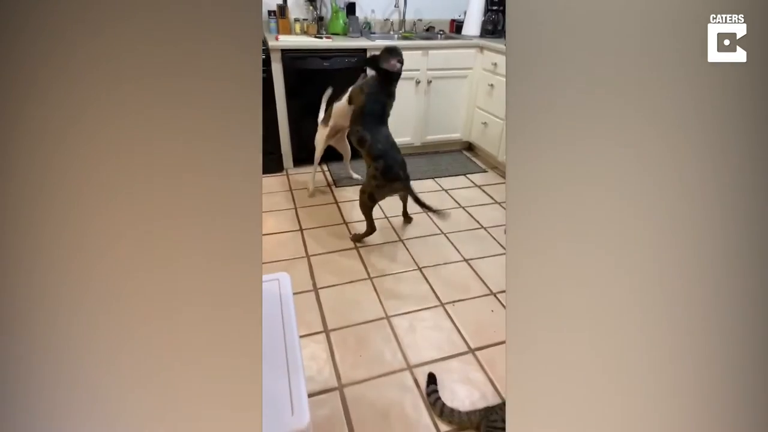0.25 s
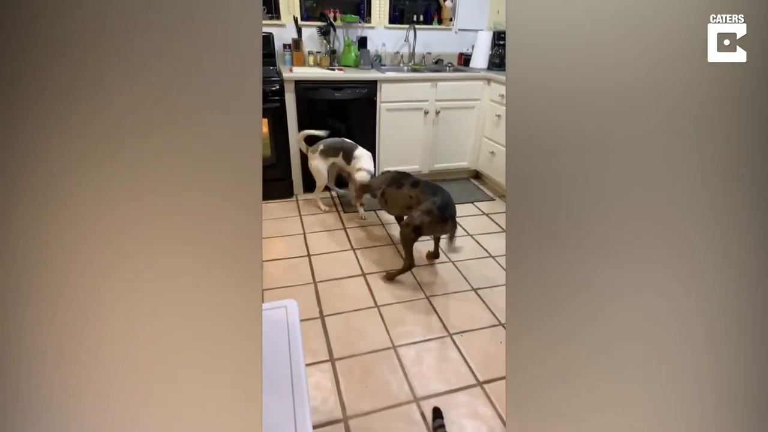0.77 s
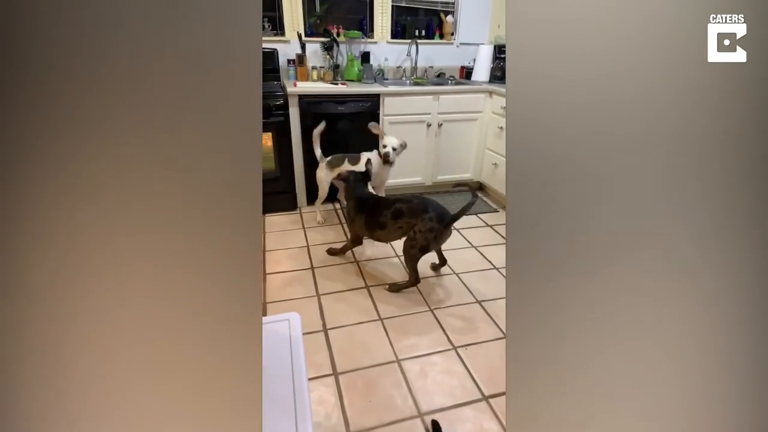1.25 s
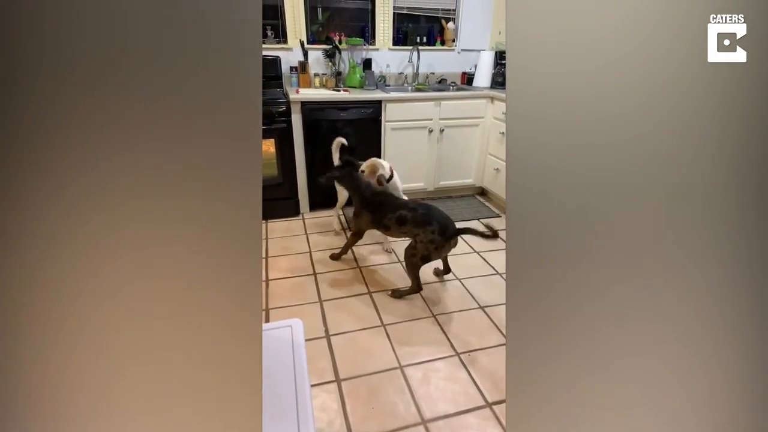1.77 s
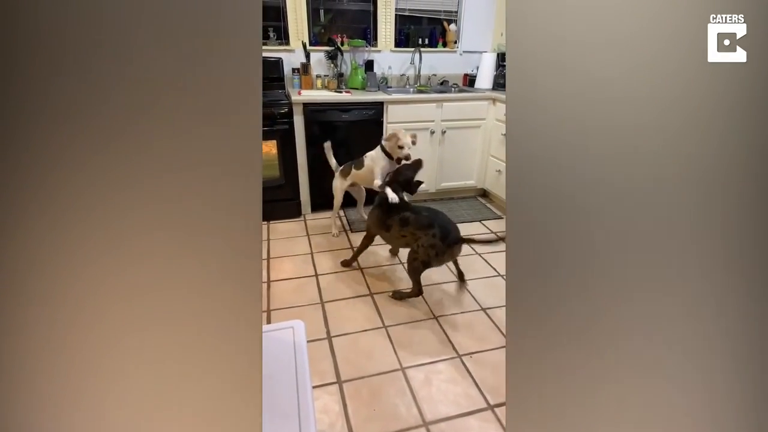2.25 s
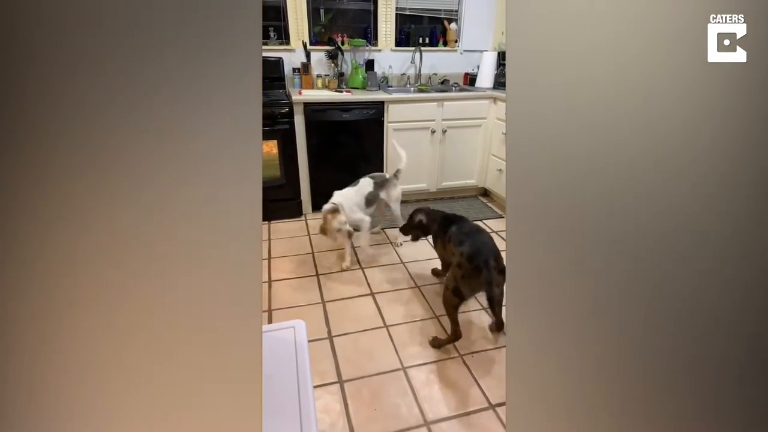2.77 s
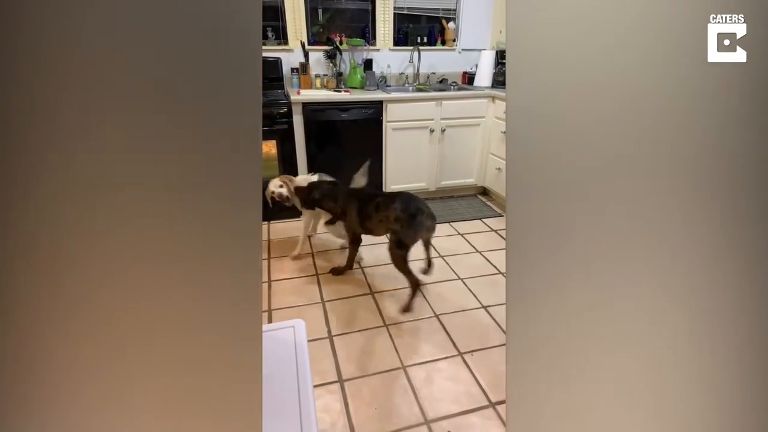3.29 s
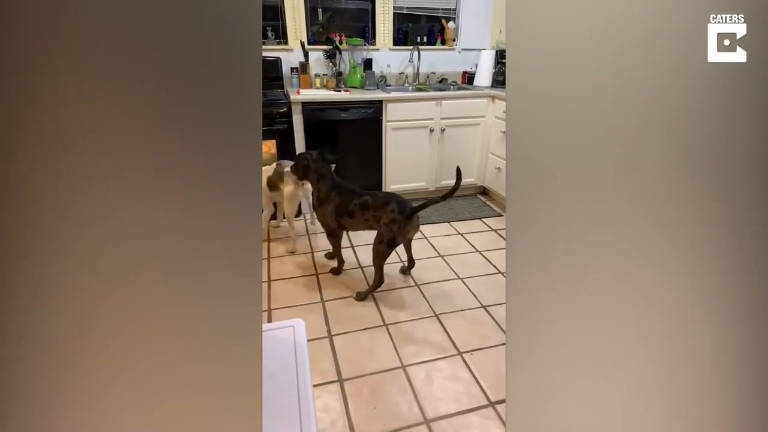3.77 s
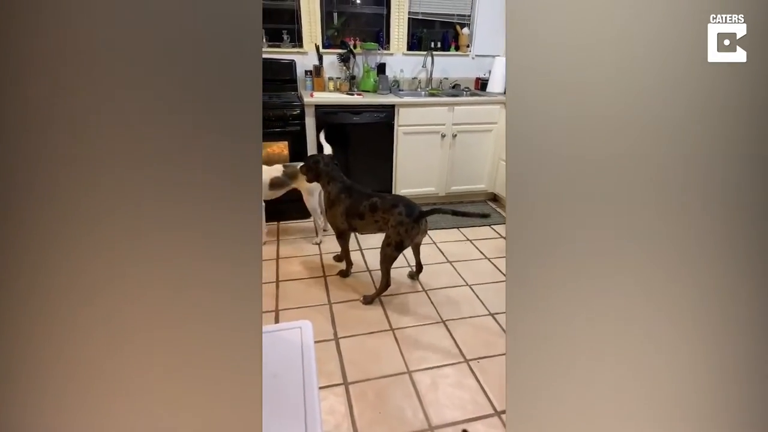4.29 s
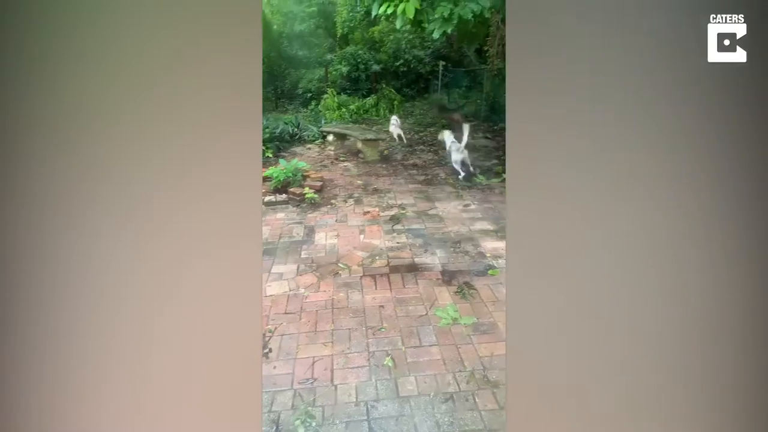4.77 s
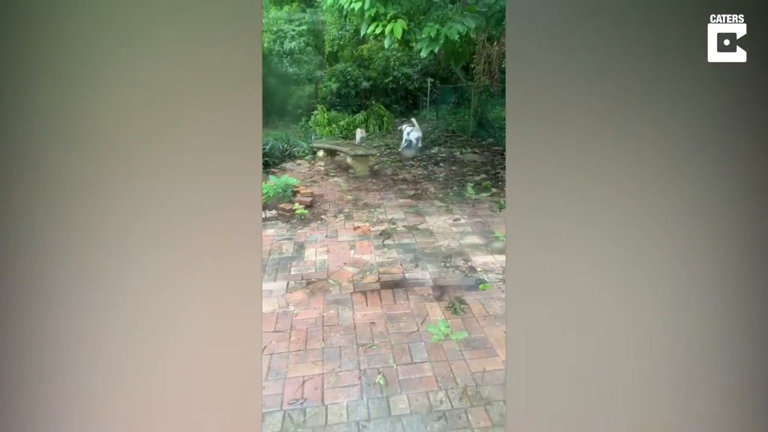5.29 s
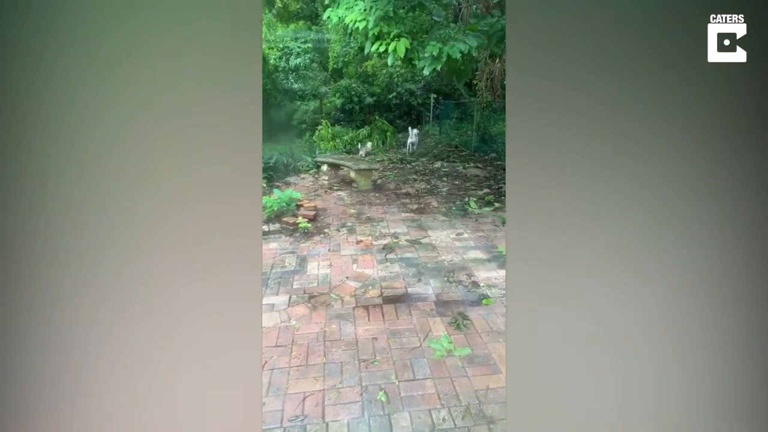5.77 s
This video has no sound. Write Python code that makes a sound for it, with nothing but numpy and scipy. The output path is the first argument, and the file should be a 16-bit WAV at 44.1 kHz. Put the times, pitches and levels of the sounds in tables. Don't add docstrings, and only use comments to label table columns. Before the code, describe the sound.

Two dogs scuffle on kitchen tiles, claws ticking and skidding, paws thumping, panting and faint squeaks over a low hum, then a droning quiet yard.

```python
import sys
import numpy as np
from scipy import signal
from scipy.fft import rfft, irfft
from scipy.io import wavfile
from scipy.ndimage import uniform_filter1d

SR = 44100
rng = np.random.default_rng(int(sys.argv[2]) if len(sys.argv) > 2 else 0)


def gain_from_decibels(decibels):
    exponent = np.asarray(decibels, float) / 20
    return 10 ** exponent


def output_pcm(signal):
    pcm = np.clip(np.atleast_2d(signal).T, -1, 1) * 32767
    wavfile.write(sys.argv[1], SR, np.round(pcm).astype(np.int16))


N = 266364

# (time [s], peak [dB], treble share [dB], low-mid share [dB], ring
# [Hz])
CLAWS = [(0.0044, -48, -14, 9, 2200), (0.175, -35, 6.5, -0.5, 2980), (0.2474, -42.5, -6, -6.5, 1370),
         (0.365, -46, -15, 5, 1290), (0.326, -47, 11, -30, 2980), (0.4471, -48.5, -24, -0.5, 980),
         (0.589, -26, 3.5, -20, 2740), (0.599, -31, -2.5, -2.5, 2220), (0.6605, -28.5, -1, -9, 2840),
         (0.7549, -26, 3.5, -12, 2040), (1.0192, -15, 5, -14.5, 3110), (1.031, -25.5, -1.5, -6, 3450),
         (1.2599, -40, -5, 2.5, 1120), (1.3778, -43.5, -29.5, 0, 2080), (1.4247, -46, 12.5, 0, 2000),
         (1.467, -42, -4, 1.5, 1840), (1.666, -43, -6, 0.5, 1580), (2.0244, -22.5, 6.5, -14.5, 2170),
         (2.1329, -19, 5, -20, 3800), (2.143, -24.5, 7, -1, 2880), (2.5281, -41.5, -6.5, -10.5, 1020),
         (2.587, -39.5, -16, -3, 1180), (2.643, -27, 3, -9, 1980), (2.678, -38, -9.5, 3, 1560),
         (2.766, -35, 11.5, -24, 1960), (2.7934, -26, -4.5, -27, 2800), (2.8, -24, -3, -12, 1810),
         (3.146, -36.5, 1.5, -12, 3230), (3.343, -25, 4.5, -15, 3760), (3.383, -27.5, -8.5, -13, 2340),
         (3.4225, -33, -3.5, -6, 1260), (3.4787, -31, -1, -27, 3480), (3.5267, -24.5, 4, -15, 1660),
         (3.535, -32.5, 5.5, -6, 3270), (3.668, -37.5, 0.5, -32.5, 2080), (3.7285, -37.5, 4.5, -23, 2590),
         (3.8315, -24, 4, -21, 2080), (3.847, -35.5, -1, -16, 2150), (4.27, -57, -18, -11.5, 1400),
         (4.424, -69.5, -5, -22, 3250),
         (0.593, -29.5, 3, -21.5, 2730), (0.606, -31, -3.5, -15, 2100), (0.6638, -28.5, -8, -3, 1210),
            (0.766, -36, 3, -15, 3970), (1.0242, -18.5, 5, -18, 4230), (1.043, -25.5, 0.5, -11.5, 4200),
            (2.587, -38, -22, 7, 700), (2.6471, -29, 1, -8, 2000), (2.671, -29.5, -12.5, -1.5, 990),
            (2.687, -33.5, -10.5, -8, 2280), (3.157, -43.5, -0.5, -9, 1200),
            (3.347, -27.5, 4.5, -13.5, 3670), (3.31, -53.5, 11.5, -23, 3000)]
# (time [s], peak [dB], body pitch [Hz], ring t60 [s])
PAWS = [(0.123, -49, 900, 0.15), (0.149, -29.5, 446, 0.029), (0.156, -34.5, 600, 0.03),
        (0.325, -52.5, 199, 0.1), (0.361, -46, 292, 0.057), (0.451, -46, 997, 0.043),
        (0.591, -38, 276, 0.05), (0.665, -31, 322, 0.021), (1.028, -30.5, 394, 0.028),
        (1.181, -41, 1480, 0.048), (1.26, -44.5, 451, 0.051), (1.274, -42, 1100, 0.03),
        (1.398, -41, 740, 0.036), (1.468, -37, 426, 0.03), (1.488, -38.5, 528, 0.031),
        (1.485, -43, 692, 0.069), (1.632, -54.5, 1677, 0.21), (2.141, -37, 277, 0.055),
        (2.139, -38, 437, 0.11), (2.169, -38, 470, 0.041), (2.203, -38.5, 468, 0.058),
        (2.243, -48.5, 454, 0.055), (2.353, -40, 273, 0.063), (2.525, -41.5, 930, 0.047),
        (2.582, -32, 365, 0.021), (2.671, -40.5, 410, 0.074), (2.703, -42, 1150, 0.023),
        (2.74, -38.5, 884, 0.047), (2.838, -40.5, 304, 0.039), (2.958, -36, 350, 0.044),
        (2.96, -35, 210, 0.028), (2.957, -36.5, 662, 0.027), (2.974, -39, 394, 0.016),
        (3.341, -49, 430, 0.12), (3.425, -40, 322, 0.061), (3.468, -44, 522, 0.22), (3.51, -46, 516, 0.11),
        (3.682, -37.5, 578, 0.032), (3.659, -44, 191, 0.053), (3.654, -37, 662, 0.036),
        (3.73, -50, 1800, 0.051), (3.951, -48, 430, 0.044), (4.245, -55, 878, 0.15)]
# (start [s], length [s], pitch [Hz], level [dB], overtones over the fundamental [dB])
WHINES = [(0.0, 0.02, 1170, -47.5, -5.5), (0.858, 0.036, 1093, -50, -18), (0.931, 0.05, 1090, -60, -13),
          (0.967, 0.03, 1075, -67, 7), (0.983, 0.036, 1115, -49.5, -21), (1.639, 0.14, 1128, -53.5, -15),
          (1.88, 0.11, 1164, -62, 11.5), (1.946, 0.07, 1165, -54, -9), (2.359, 0.08, 1166, -61, 7),
          (2.401, 0.058, 1128, -51, -41), (2.568, 0.089, 1098, -44.5, -28), (2.651, 0.066, 1113, -48, -5.5),
          (2.859, 0.082, 1222, -49.5, -5.5), (2.89, 0.09, 1133, -48.5, -8.5),
          (3.324, 0.053, 1264, -44, -10.5), (3.366, 0.13, 1259, -47, -17), (3.695, 0.14, 1246, -45.5, -10),
          (3.725, 0.047, 1277, -39.5, -11.5), (3.782, 0.075, 1240, -67, -19), (3.934, 0.05, 1258, -70, -6),
          (4.564, 0.079, 1333, -66, -10)]
# (start [s], length [s], effort [dB], main mouth resonance [Hz])
PANTS = [(0.0, 0.076, -61, 1212), (0.108, 0.21, -48.5, 917), (0.24, 0.37, -57.5, 935),
         (0.433, 0.11, -48, 935), (0.589, 0.16, -38.5, 1032), (0.66, 0.11, -53, 925),
         (0.832, 0.062, -44.5, 1079), (0.987, 0.15, -43.5, 997), (1.159, 0.11, -69.5, 891),
         (1.227, 0.12, -47.5, 1068), (1.347, 0.085, -50.5, 950), (1.457, 0.039, -45, 707),
         (1.607, 0.15, -55.5, 1162), (1.842, 0.24, -44.5, 1098), (2.1, 0.073, -54, 1143),
         (2.345, 0.062, -44, 852), (2.405, 0.11, -59, 1136), (2.534, 0.047, -43.5, 1010),
         (2.648, 0.19, -46.5, 1010), (2.786, 0.059, -67, 1012), (2.837, 0.26, -46, 1156),
         (3.126, 0.09, -43, 1065), (3.178, 0.096, -43, 866), (3.317, 0.073, -69, 1200),
         (3.403, 0.15, -43.5, 827), (3.634, 0.076, -59, 800), (3.703, 0.052, -49.5, 1185),
         (3.925, 0.042, -77.5, 1131), (4.184, 0.1, -58, 1301), (4.235, 0.075, -62, 927)]
# (factor on the main resonance [ratio], width [Hz], level [dB])
MOUTH = [(0.519, 162, -1), (1.0, 170, 6), (1.698, 293.4, -9.5), (2.398, 343, -12)]
# (start [s], length [s], pressure [dB])
SLIDES = [(0.0, 0.048, -49.5), (0.069, 0.12, -57), (0.295, 0.056, -77), (0.464, 0.14, -66),
          (0.614, 0.21, -77), (0.782, 0.31, -61.5), (1.075, 0.21, -53), (1.359, 0.1, -52),
          (1.634, 0.16, -55.5), (1.821, 0.19, -50), (2.035, 0.1, -59), (2.311, 0.19, -52),
          (2.454, 0.23, -49), (2.568, 0.075, -57), (2.701, 0.14, -47), (2.825, 0.16, -47),
          (2.888, 0.32, -65), (3.16, 0.55, -64), (3.24, 0.12, -64), (3.43, 0.15, -61), (3.531, 0.19, -44.5),
          (3.678, 0.13, -46.5), (3.845, 0.084, -65), (4.214, 0.08, -78)]
# (frequency [Hz], level [dB])
SLIDE_COLOUR = [(900, -7), (1800, -5), (3000, -9.5), (4300, -12), (6500, -7.5), (8500, -22.5)]
# (frequency [Hz], t60 [s])
ROOM_DECAY = [(250, 0.37), (700, 0.43), (1800, 0.46), (4600, 0.39), (8000, 0.31)]
# (full level until [s], silent from [s])
FADE = (3.895, 4.614)
# (frequency [Hz], rms level [dB])
FRIDGE = [(59.6, -68.5), (119.3, -54), (238.6, -82)]
# (frequency [Hz], density [dB per Hz])
KITCHEN_AIR = [(12, -53), (20, -1.5), (123, 3), (185, -2), (2260, -27), (4400, -34), (4870, -70),
               (5400, -46), (6790, -37.5), (9000, -61), (11700, -79), (19800, -120)]
# (start [s], length [s], leaves level [dB], thud level [dB])
STRIDES = [
    (4.649, 0.12, -76.5, -53.5),
    (4.713, 0.14, -68, -55.5),
    (4.82, 0.14, -77, -63.5),
    (4.894, 0.062, -71, -66),
    (4.913, 0.071, -80, -54),
    (4.957, 0.095, -78, -70),
    (5.265, 0.13, -78, -83),
    (5.318, 0.13, -79.5, -70),
    (5.429, 0.075, -79.5, -79),
    (5.704, 0.062, -88.5, -74.5),
]
# (time [s], peak [dB], treble [dB], low-mid [dB], ring [Hz], firm snap at that distance [dB])
TWIG = (4.727, -62, 18, -10, 2500, -62)
# (frequency [Hz], rms level [dB])
COMPRESSOR = [(59.2, -58.5), (118.4, -47), (236.9, -68.5), (355.3, -76.5), (414.5, -70), (532.9, -76.5),
              (651.4, -78), (1249, -75.5), (1308, -69), (1427, -90), (2374, -97), (3801, -99.5)]
# (frequency [Hz], density [dB per Hz])
YARD_AIR = [(12, -41.5), (20, -3.5), (69, -15), (125, -4), (174, -16.5), (308, -24), (419, -26.5),
            (909, -44.5), (1270, -32.5), (1560, -52), (2300, -55), (4860, -61), (6620, -58), (9500, -74.5),
            (12400, -107), (20900, -120)]
# (frequency [Hz], level [dB])
MICROPHONE = [(20, 0), (4200, 0), (4650, -7), (4880, -20.5), (5120, -4.5), (5600, -2), (8400, 5.5),
              (8800, -4.5), (9100, -23.5), (9500, -12.5), (9900, -30), (10500, -94.5)]
# (frequency [Hz], step over the neighbouring level [dB])
ROUNDING_STEP = [(400, -30), (1200, -11), (2200, -5), (3200, 0), (4000, 2), (4850, 6), (5500, -1),
                 (8600, 0), (9300, 5), (10000, 12)]


def evened(x):
    return x / np.sqrt(np.mean(x ** 2) + 1e-20)


def read(points, hz):
    f, value = np.transpose(points)
    return np.interp(np.log(hz + 1), np.log(f + 1), value)


def coloured(x, points):
    gain = gain_from_decibels(read(points, np.fft.rfftfreq(len(x), 1 / SR)))
    return irfft(rfft(x) * gain, len(x))


def add(mix, s, sound):
    part = mix[round(s * SR):][:len(sound)]
    part += sound[:len(part)]


def resonate(x, hz, width):
    turn = np.exp(2j * np.pi * np.cumsum(hz * np.ones(len(x))) / SR)
    r = np.exp(-np.pi * width / SR)
    return 2 * (turn * signal.lfilter([1 - r], [1, -r], x / turn)).real


def wander(per_s):
    size = max(int(SR / per_s), 1)
    return evened(uniform_filter1d(uniform_filter1d(rng.standard_normal(N), size), size))


def strokes(starts, lengths, levels_db, rest_db):
    peak_at = 0.32
    out = gain_from_decibels(rest_db) * np.ones(N)
    for s, length, db in zip(starts, lengths, levels_db):
        u = np.arange(0, length, 1 / SR) / length
        swell = np.minimum(u / peak_at, (1 - u) / (1 - peak_at))
        add(out, s, gain_from_decibels(db) * np.sin(np.pi / 2 * swell) ** 2)
    return out


def claw(s, peak_db, treble_db, low_db, ring_hz, firm_db=-29.5):
    t = np.arange(2048) / SR
    skid_ms = 5.07 + max(firm_db - peak_db, 0)
    rate = 1000 / max(skid_ms, .3)
    chatter = rng.standard_normal(2048) * gain_from_decibels(2 * rng.standard_normal(64)).repeat(32)
    burst = chatter * np.exp(-rate * t) * (1 - np.exp(-9 * rate * t))
    shape = [(250, low_db + 9.0), (1000, low_db + 12.0), (2300, 0.8), (4000, -4.0),
             (6600, treble_db), (9000, treble_db - 16.0)]
    hz = np.geomspace(400, 9000, num=24)
    ring_db = 5.5 * np.exp(-(np.log2(hz / ring_hz) / 0.25) ** 2)
    lumps = np.c_[hz, ring_db + 1.6 * rng.standard_normal(24)]
    burst = coloured(coloured(np.pad(burst, 256), shape), lumps)
    return s - 256 / SR, gain_from_decibels(peak_db + 0.5) * burst / abs(burst).max()


def paw(s, peak_db, hz, t60):
    t = np.arange(8000) / SR
    dull = [(80, -20), (hz / 2, -4), (hz, 0), (hz * 2, -6), (3000, -30)]
    puff = evened(coloured(rng.standard_normal(8000), dull))
    ring = np.sin(2 * np.pi * hz * t) + .3 * puff
    push = 1 - np.exp(-t / 0.0022)
    return s, 0.99 * gain_from_decibels(peak_db - 60 * t / max(t60, .01)) * ring * push


def whine(s, length, hz, level_db, overtones_db):
    climb, scoop, scoop_share, jitter = .02, .03, .25, .007
    third_db, fall_db = -4.5, 7
    shimmer_db, sag_db, rise = 3.5, -3, .2
    u = np.arange(0, length, 1 / SR) / length
    chance = rng.standard_normal((9, SR // 4))
    levels_db = [0, overtones_db] + [overtones_db + third_db - fall_db * k for k in range(6)]
    shake = evened(uniform_filter1d(chance[0], 200))[:len(u)]
    pitch = hz * (1 + climb * (u - .5) - scoop * np.exp(-u / scoop_share) + jitter * shake)
    turns = np.cumsum(pitch) / SR
    shimmer = gain_from_decibels(shimmer_db * evened(uniform_filter1d(chance[1:], 380)))[:, :len(u)]
    voice = sum(gain_from_decibels(db) * shimmer[k] * np.sin(2 * np.pi * (k + 1) * turns)
                for k, db in enumerate(levels_db))
    return s, voice * gain_from_decibels(level_db + sag_db * u) * np.clip(np.minimum(u, 1 - u) / rise, 0, 1)


def sinking_db():
    return -74 * np.maximum(np.arange(N) / SR - FADE[0], 0)


def panting():
    s, length, pant_db, mouth_hz = np.transpose(PANTS)
    breath = rng.standard_normal(N) * gain_from_decibels(3 * wander(30))
    held = np.c_[s + .2 * length, s + .6 * length].ravel()
    mouth = np.interp(np.arange(N) / SR, held, mouth_hz.repeat(2))
    pant = np.zeros(N)
    for factor, width, db in MOUTH:
        once = resonate(breath, factor * mouth, width)
        pant += gain_from_decibels(db) * resonate(once, factor * mouth, width)
    return gain_from_decibels(-10.0) * evened(pant) * strokes(s, length, pant_db, -64.5 + sinking_db())


def sliding():
    slips = rng.standard_normal(N) * (rng.random(N) < 1000 / SR) * gain_from_decibels(4.5 * wander(30))
    drag = evened(coloured(slips, SLIDE_COLOUR))
    return gain_from_decibels(-4.0) * drag * strokes(*np.transpose(SLIDES), -78 + sinking_db())


def room(x):
    out, t = np.zeros(N), np.arange(N) / SR
    for k in range(3):
        taps = np.zeros(SR // 2)
        at = np.arange(160, len(taps) - 12, 12)
        taps[at + rng.integers(0, 12, len(at))] = rng.choice([-1., 1.], len(at))
        hz, lag, z = signal.stft(taps, SR, nperseg=256)
        t60 = np.maximum(read(ROOM_DECAY, hz), .05)[:, None]
        tail = signal.istft(z * gain_from_decibels(-60 * lag / t60), SR, nperseg=256)[1]
        turn = np.sqrt(2 / 3) * np.cos(2 * np.pi * (3.1 * t + k / 3))
        out += signal.fftconvolve(x * turn, tail / np.linalg.norm(tail))[:N]
    return out


def dogs():
    feet, voice = panting() + sliding(), np.zeros(N)
    for row in CLAWS:
        add(feet, *claw(*row))
    for row in PAWS:
        add(feet, *paw(*row))
    for row in WHINES:
        add(voice, *whine(*row))
    return feet + voice + room(gain_from_decibels(-1.5) * feet + gain_from_decibels(-6.5) * voice)


def distant_paws():
    s, length, leaves_db, thud_db = np.transpose(STRIDES)
    crackle = rng.standard_normal(N) * gain_from_decibels(2.2 * wander(76))
    dry_leaf = [(700, -29.0), (1500, 4.0), (2000, -0.5), (2700, -7.0), (4500, -23.5), (8000, -27.5)]
    leaves = strokes(s, length, leaves_db, -88) * evened(coloured(crackle, dry_leaf))
    high = resonate(resonate(crackle, 665, 180), 665, 180)
    low = resonate(resonate(crackle, 470, 140), 470, 140)
    thuds = strokes(s, length, thud_db - 5.5, -80) * evened(high + 1.3 * low)
    add(leaves, *claw(*TWIG))
    return leaves + thuds


def machine(lines, waver_db, drift):
    t = np.cumsum(1 + drift * wander(2.5)) / SR
    out = np.zeros(N)
    for hz, db in lines:
        level = np.sqrt(2) * gain_from_decibels(db + waver_db * wander(10.0))
        out += level * np.sin(2 * np.pi * (hz * t + rng.random()))
    return out


def air(points, level_db, gust_db):
    return gain_from_decibels(level_db + gust_db * wander(6.5)) * evened(coloured(rng.standard_normal(N), points))


def kitchen():
    left = FADE[1] - np.arange(N) / SR
    scuffle = dogs() * np.clip(left / 0.03, 0, 1)
    steady = machine(FRIDGE, 0.76, 0.0073) + air(KITCHEN_AIR, -58, 1.2)
    fade = np.clip(left / (FADE[1] - FADE[0]), 0, 1) ** 0.99
    return steady * fade + scuffle


def yard():
    start_s, rise_s = 4.661, 0.0023
    strides = distant_paws()
    drone = machine(COMPRESSOR, 1.2, 0.00014) + air(YARD_AIR, -53, 1.8)
    return (drone + strides) * np.clip((np.arange(N) / SR - start_s) / rise_s, 0, 1)


def scene():
    return (kitchen() + yard())[None]


def spectral_rounding(x):
    frame = dict(nperseg=1024, noverlap=512, window="cosine")
    hz, _, z = signal.stft(x, SR, **frame)
    loudness = abs(z) * (hz > 500)[:, None]
    neighbours = uniform_filter1d(loudness, size=45, axis=0) + 1e-12
    spread = evened(uniform_filter1d(rng.standard_normal((104, z.shape[1])), 3))
    by_band = spread.repeat(5, axis=0)[:len(hz)]
    step = neighbours * gain_from_decibels(read(ROUNDING_STEP, hz)[:, None] + 5.5 * by_band)
    return signal.istft(np.round(z / step) * step, **frame)[1][:N]


def low_pass(x):
    return signal.sosfilt(signal.butter(12, 9920, fs=SR, output="sos"), x)


def record(dry):
    ceiling = 0.2
    heard = ceiling * np.tanh(coloured(dry[0], MICROPHONE) / ceiling)
    heard = spectral_rounding(heard) + gain_from_decibels(-106.5) * rng.standard_normal(N)
    return low_pass(heard[None])


dry = scene()
out = record(dry)
output_pcm(out)
```